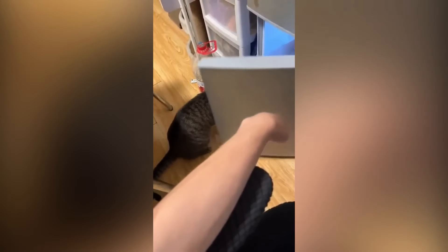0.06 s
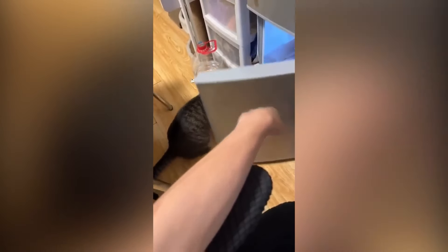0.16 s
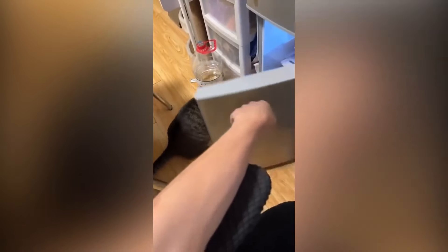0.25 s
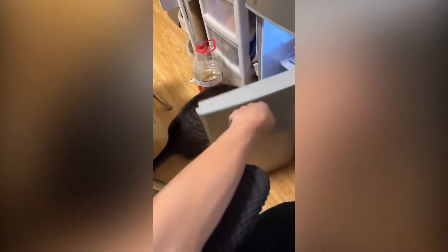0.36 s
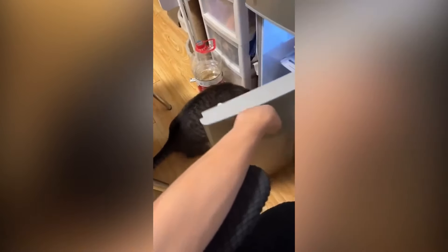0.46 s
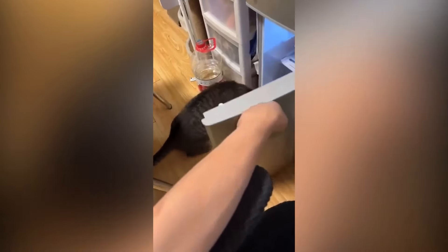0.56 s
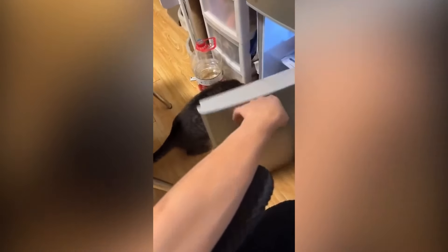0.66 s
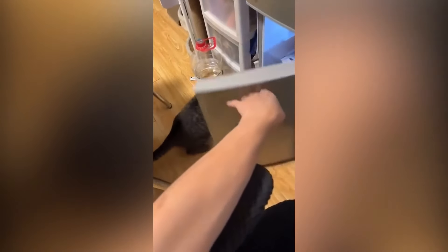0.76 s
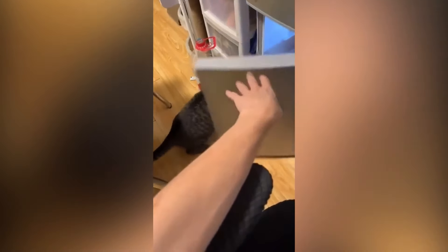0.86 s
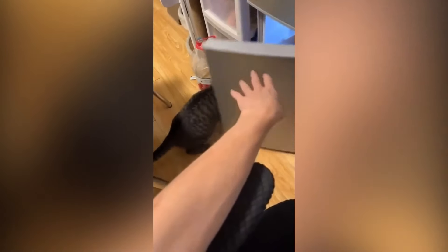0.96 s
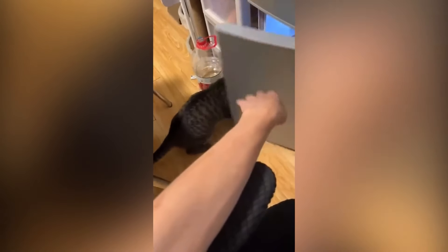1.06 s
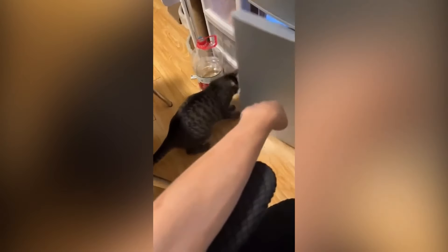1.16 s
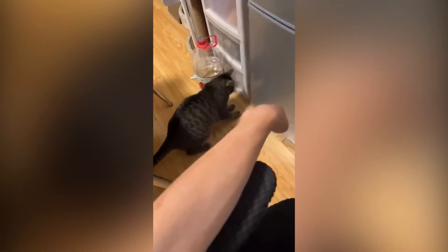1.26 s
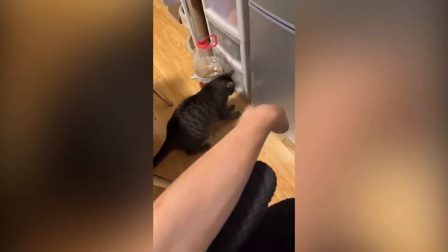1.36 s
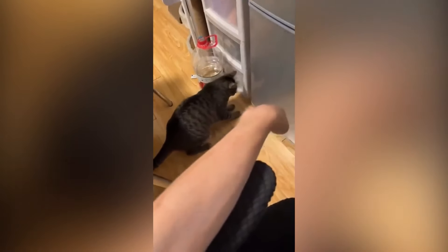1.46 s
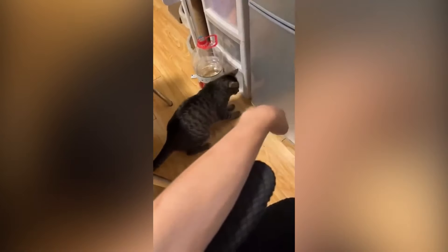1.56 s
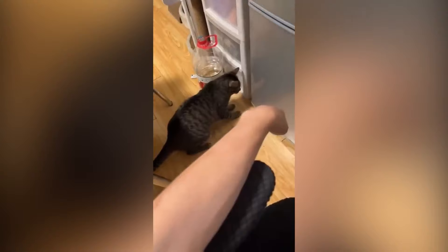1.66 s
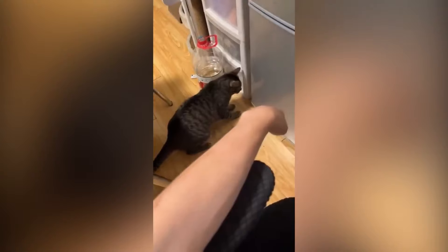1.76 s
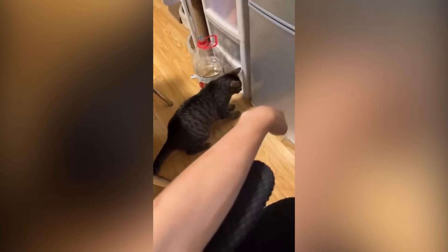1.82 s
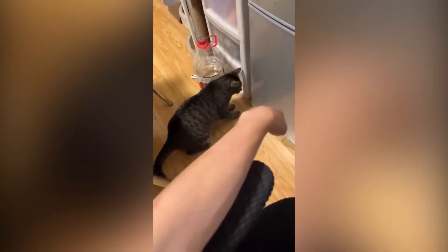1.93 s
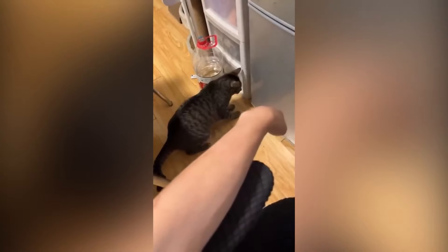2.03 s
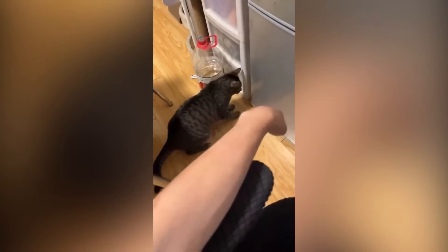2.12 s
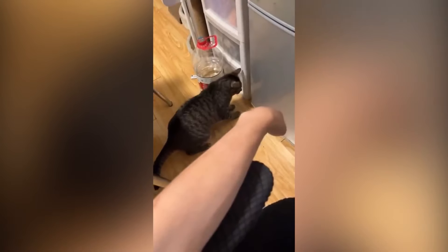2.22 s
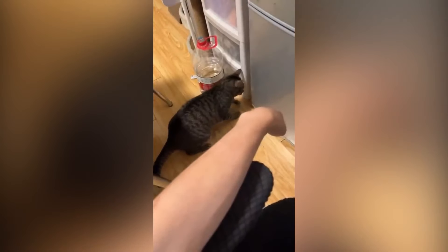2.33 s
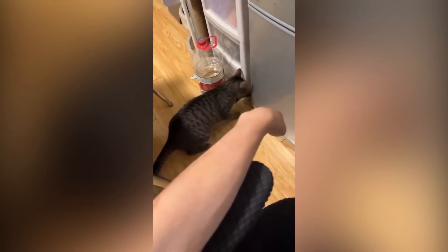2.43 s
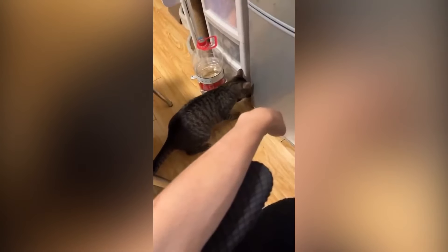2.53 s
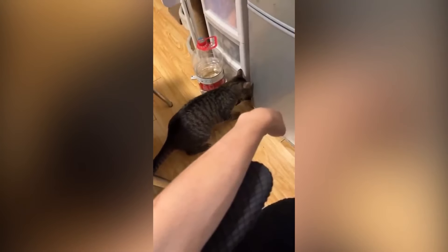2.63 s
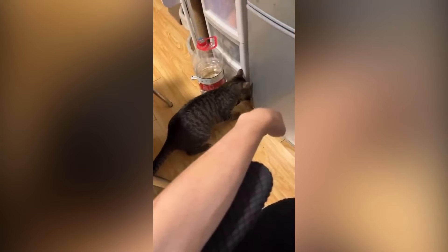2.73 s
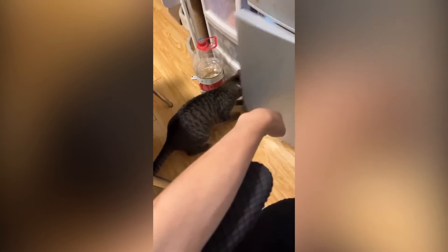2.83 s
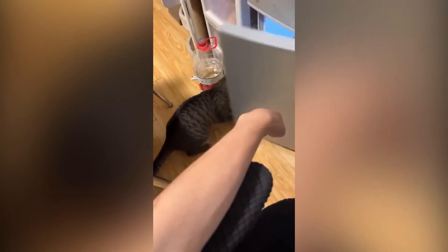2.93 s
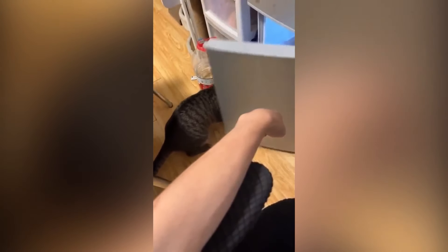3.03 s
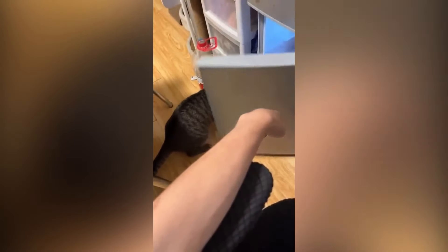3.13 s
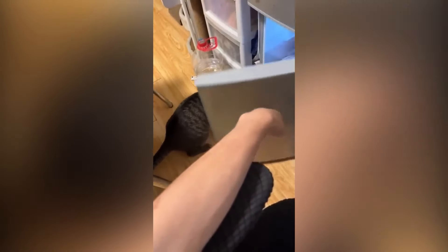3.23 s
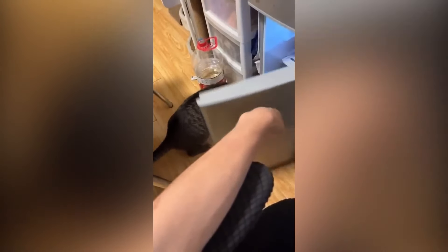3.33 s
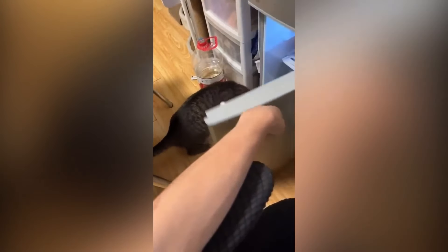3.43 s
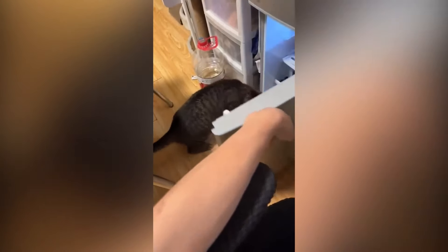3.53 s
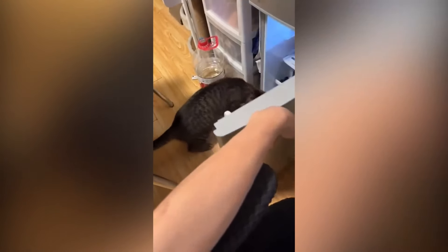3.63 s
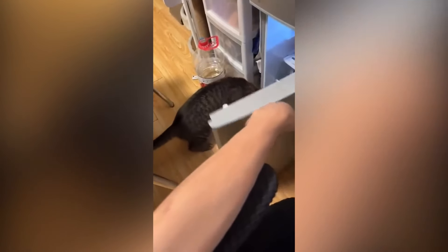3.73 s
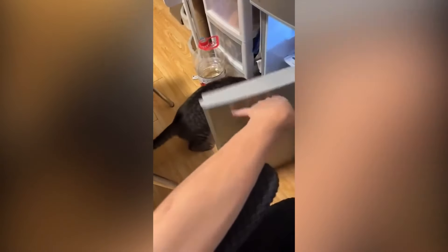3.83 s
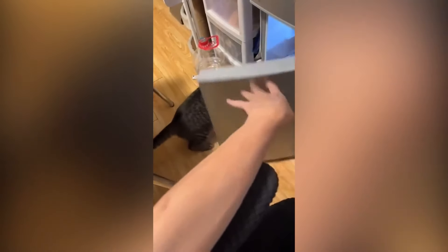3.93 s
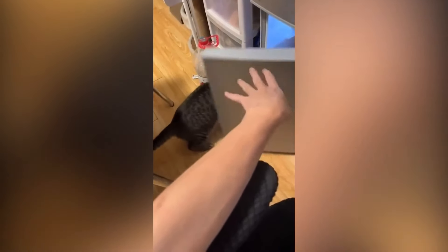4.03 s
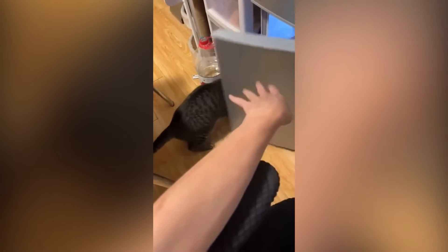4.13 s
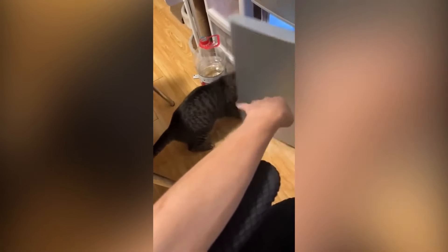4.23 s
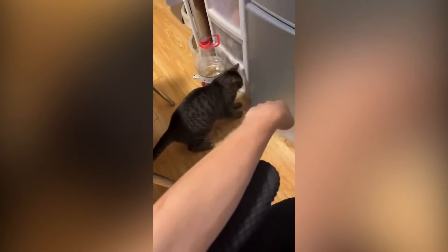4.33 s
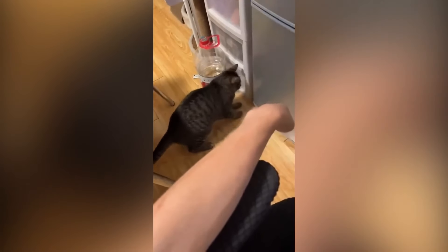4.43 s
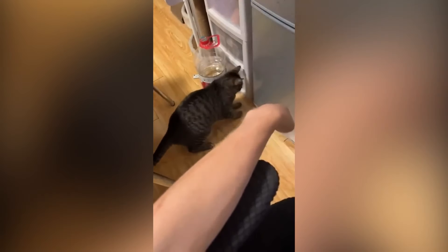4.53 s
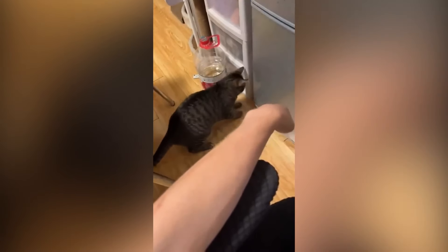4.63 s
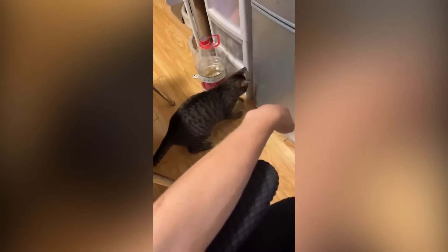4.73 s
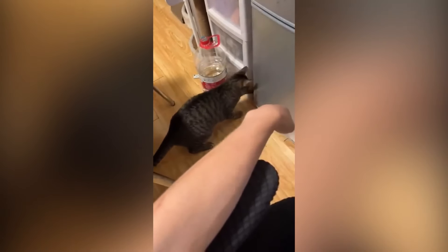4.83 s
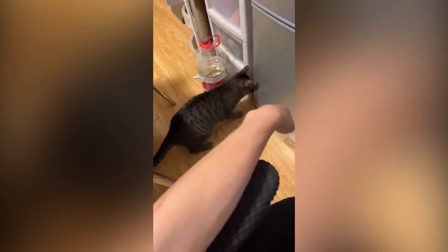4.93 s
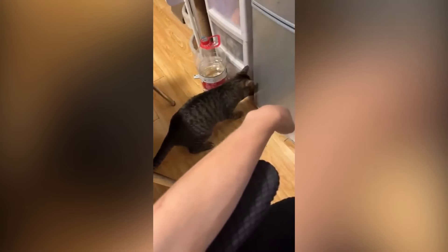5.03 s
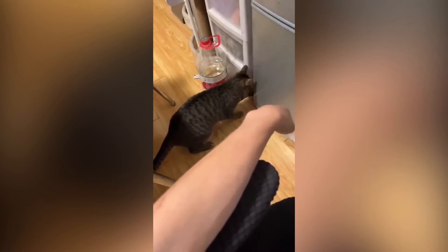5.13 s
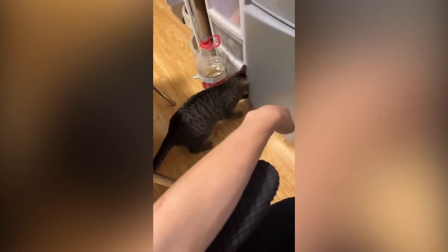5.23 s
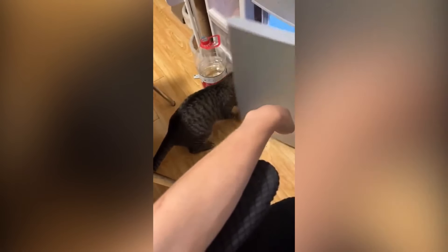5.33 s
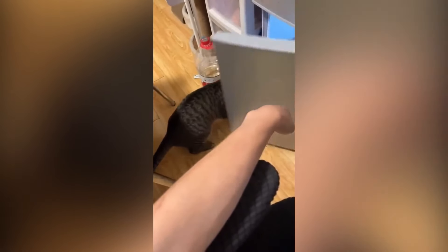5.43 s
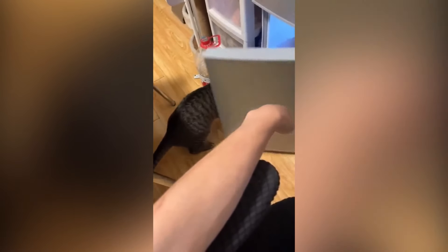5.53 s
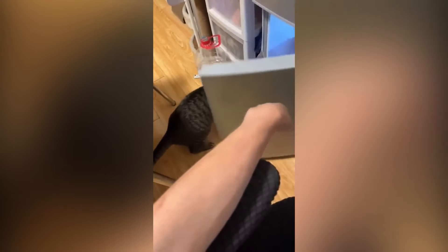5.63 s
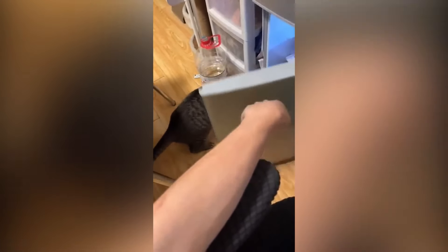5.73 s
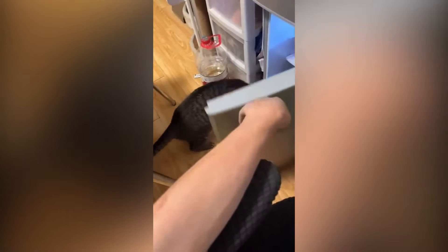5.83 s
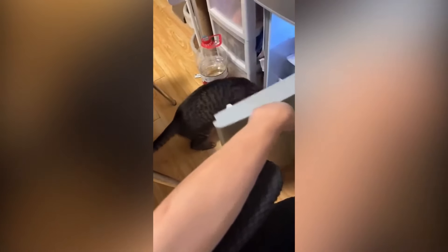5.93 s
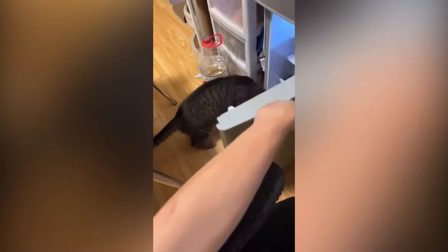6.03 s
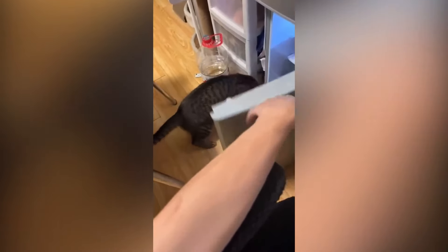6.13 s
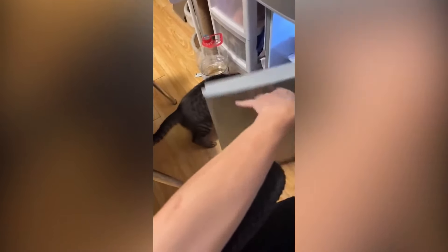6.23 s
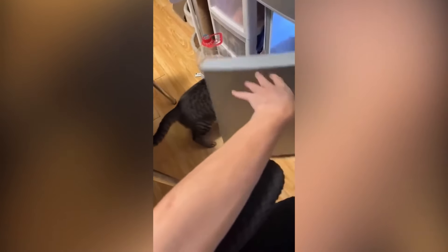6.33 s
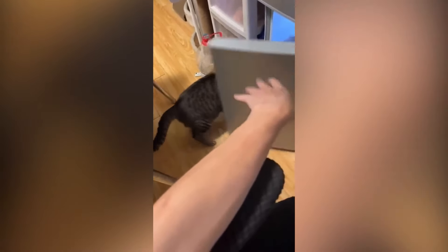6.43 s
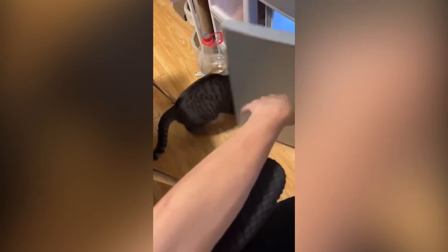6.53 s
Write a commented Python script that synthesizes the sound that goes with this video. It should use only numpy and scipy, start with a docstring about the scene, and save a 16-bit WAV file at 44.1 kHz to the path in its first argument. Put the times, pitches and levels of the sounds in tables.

```python
"""In a quiet room, a small fridge is swung open and pushed shut by hand, close to a microphone.
Friction noise and squeaks are the seal, load and hand; the seal pops, the door knocks at its open stop,
and a loose load clacks in the shelf: noise contacts exciting damped modes, dense ringing and the room.
Twice the door thuds home and low cabinet modes boom. Coloured noise is the air, wavering sines the
compressor's hum and whine; a low rumble, two deep hums and a rustling arm lie beneath."""
import sys
import numpy as np
from scipy import signal
from scipy.fft import rfft, irfft
from scipy.io import wavfile
from scipy.ndimage import uniform_filter1d

SR = 44100
rng = np.random.default_rng(int(sys.argv[2]) if len(sys.argv) > 2 else 0)


def dump_mix(stems):
    """Bounce the given channels to the path in sys.argv[1] as a 16-bit WAV at rate SR."""
    frames = np.atleast_2d(stems).T  # one column per channel
    limited = np.clip(frames, -1, 1)  # hard clip at full scale
    pcm = np.round(limited * 32767).astype(np.int16)
    wavfile.write(sys.argv[1], SR, pcm)


N = 289673

# Event levels are relative: each source's function adds its own trim.
# Door shuts: start_s, crack_level_db, tilt_db_per_octave, boom_gain_db
SHUT_EVENTS = [(1.353, -10.5, -0.37, -1), (4.481, -9.5, -0.5, -1)]
# Loose load slides, clacks in the door shelf, settles:
# start_s, level_db, tilt_db_per_octave, contact_ms, slide_db, settle_db
CLACK_EVENTS = [(0.7359, -30.5, 0.5, 5.7, -57, -54.5), (3.882, -22.5, 0.5, 14, -62, -64),
                (6.2306, -27, 1.5, 7.8, -62, -53)]
# Door meets its open stop, or the hand bumps it: start_s, level_db, tilt_db_per_octave, contact_ms
KNOCK_EVENTS = [(.211, -46.5, 2, 4.5), (.397, -28.5, -1.5, 7.1), (2.647, -41.5, -6, 8.7),
                (3.526, -26, 2, 7.8), (3.615, -39.5, 1.5, 3.4), (5.942, -27.5, .5, 8.2)]
# Magnetic seal peels and pops; the first, faint pop comes before it lets go: start_s, level_db,
# tilt_db_per_octave, contact_ms, peel_db
POP_EVENTS = [(2.722, -34, -1, 4.5, -72), (2.921, -28.5, 1, 5.7, -50), (5.3476, -24.5, -0.5, 6.2, -48)]
# Door panel modes: mode_hz, relative_level_db, t60_s
DOOR_MODES = [(125, -5.5, 0.4), (191.8, -1, 0.41), (261, -1, 0.25), (316, -18, 0.052), (381, -6, 0.27),
              (446.5, -10.5, 0.24), (523, -6.5, 0.23), (910, 2, 0.082), (1072, 9.5, 0.041),
              (1340, 3, 0.095), (1700, 9.5, 0.076), (1780, -6, 0.17), (2810, 13.5, 0.044)]


def amp(db):
    """Decibels to gain."""
    return 10 ** (np.asarray(db) / 20)


def evened(x):
    """Scales to rms 1."""
    return x / np.sqrt(np.mean(x ** 2) + 1e-20)


def unit(x):
    """Scales to energy 1."""
    return x / np.linalg.norm(x)


def decay(t, t60_s):
    """Exponential fall of 60 dB in t60_s."""
    return np.exp(-np.log(1000) * t / t60_s)


def read(points, hz):
    """Interpolates a table on a log-frequency axis."""
    f, value = np.transpose(points)
    return np.interp(np.log(hz + 1), np.log(f + 1), value)


def add(mix, start_s, sound):
    """Mixes a sound in at start_s, or at 0 if that is earlier."""
    part = mix[max(round(start_s * SR), 0):][:len(sound)]
    part += sound[:len(part)]


def noise(tone, size):
    """Noise of a given colour, rms 1."""
    gain = amp(read(tone, np.fft.rfftfreq(size, 1 / SR)))
    return evened(irfft(rfft(rng.standard_normal(size)) * gain, size))


def drift(width_hz):
    """Slow random wander: noise under a Gaussian low-pass, rms 1."""
    gain = np.exp(-(np.fft.rfftfreq(N, 1 / SR) / width_hz) ** 2)
    return evened(irfft(rfft(rng.standard_normal(N)) * gain, N))


def colour(x, tone, tilt_db_per_octave, size=4096):
    """Minimum-phase filter: a spectrum, tilted about 1 kHz."""
    hz = abs(np.fft.fftfreq(size, 1 / SR))
    octaves = np.log2(np.maximum(hz, 100) / 1000)  # tilt stops below 100 Hz
    log_gain = np.log(amp(read(tone, hz) + tilt_db_per_octave * octaves))
    response = np.exp(np.conj(signal.hilbert(log_gain)))
    taps = np.fft.ifft(response).real[:size // 2]
    return signal.fftconvolve(x, taps)[:len(x)]


def swells(strokes):
    """Hann-shaped level of strokes: middle_s, length_s, peak_db."""
    level = np.zeros(N)
    for middle_s, length_s, peak_db in strokes:
        start_s = middle_s - length_s / 2
        shape = signal.windows.hann(max(round(length_s * SR), 8))
        skipped = max(-round(start_s * SR), 0)  # part before time 0
        add(level, start_s, amp(peak_db) * shape[skipped:])
    return level


def friction(strokes, tone, grain_db, grain_hz):
    """Strokes of stick and slip: grainy noise that swells and fades."""
    grain = amp(grain_db * drift(grain_hz))
    return swells(strokes) * evened(noise(tone, N) * grain)


def chatter(envelope, count=3):
    """A burst under an envelope that holds all frequencies about equally."""
    burst = rng.standard_normal(len(envelope)) * envelope
    for _ in range(count):
        flat = irfft(np.exp(1j * np.angle(rfft(burst))), len(burst))
        burst = flat * envelope ** (1 / 4)
    return burst


def room_tail(t, rise_s):
    """Dense reflections that build up, then die band by band."""
    # Room decay: band_hz, t60_s
    room_decay = [(100, 0.52), (400, 0.31), (1200, 0.31), (3000, 0.35), (7000, 0.35), (14000, 0.23)]
    hz, frame_s, bands = signal.stft(rng.standard_normal(len(t)), SR, nperseg=256)
    fading = bands * decay(frame_s, read(room_decay, hz)[:, None])
    tail = signal.istft(fading, SR, nperseg=256)[1][:len(t)]
    return unit(tail * (1 - np.exp(-t / rise_s)))


def blow(tone, ringing, tilt_db_per_octave, contact_ms, swell, modes_db, shell_db, shell_t60_s, room_db):
    """One blow: chattering contact, the struck part's modes, dense shell ringing and the room."""
    t = np.arange(SR * 3 // 4) / SR
    progress = t * 1000 / max(contact_ms, .3)
    contact = unit(chatter(np.exp(-(progress - swell) ** 2)))  # peaks at swell contact times
    modes = unit(sum(amp(db) * decay(t, t60_s) * np.sin(2 * np.pi * (hz * t + rng.random()))
                     for hz, db, t60_s in ringing))
    shell = unit(chatter(decay(t, shell_t60_s)))
    ring = amp(modes_db) * modes + amp(shell_db) * shell
    ring = ring * (1 - np.exp(-2 * progress))  # builds while the contact lasts
    tail = amp(room_db) * room_tail(t, rise_s=0.0019)
    sound = colour(contact + ring + tail, tone, tilt_db_per_octave)
    return unit(sound) * np.sqrt(SR // 50)  # level is the energy spread over 20 ms


def blows(rows, tone, ringing, level_db, swell, modes_db, shell_db, shell_t60_s, room_db):
    """Plays a table of like blows, all trimmed by level_db."""
    out = np.zeros(N)
    for start_s, db, tilt, contact_ms, *_ in rows:
        one = blow(tone, ringing, tilt, contact_ms, swell, modes_db, shell_db, shell_t60_s, room_db)
        add(out, start_s, amp(db + level_db) * one)
    return out


def boom(rise_s=0.0032):
    """Two close low modes start in opposition, so the boom swells before it dies."""
    # Cabinet and room modes: mode_hz, level_db, t60_s, polarity
    cabinet_modes = [(41.4, -23, 0.73, -1), (49.8, -3, 0.41, -1), (54.03, 0, 0.33, 1),
                     (68.96, -13, 0.59, 1), (126.5, -18, 0.47, -1)]
    t = np.arange(SR * 3 // 2) / SR
    modes = sum(np.sign(polarity) * amp(db) * decay(t, t60_s) * np.sin(2 * np.pi * hz * t)
                for hz, db, t60_s, polarity in cabinet_modes)
    return modes * (1 - np.exp(-t / rise_s))


def room_air(level_db=-53):
    """Steady coloured noise of the room air."""
    # Air spectrum: frequency_hz, relative_level_db_per_hz
    air_tone = [(20, -33), (40, 1.5), (80, 6.5), (115, -2), (160, 1), (210, 2.5), (540, -1.5), (850, -11.5),
                (2100, -16.5), (3300, -18), (5300, -29.5), (8000, -31), (11500, -41.5), (13300, -33.5),
                (16000, -56)]
    return amp(level_db) * noise(air_tone, N)


def rumble(centre_hz=50, width_hz=11, rest_db=-63.5, linger_db=-28.5, fall_db_per_s=44):
    """Low narrow-band noise in the room that rests low and lingers after each shut."""
    t = np.arange(N) / SR
    wander = drift(width_hz) + 1j * drift(width_hz)
    band = evened((wander * np.exp(2j * np.pi * centre_hz * t)).real)
    linger = sum((t > s) * amp(linger_db - fall_db_per_s * abs(t - s)) for s, *_ in SHUT_EVENTS)
    return band * (amp(rest_db) + linger)


def sealed(t, fade_s=0.42):
    """1 from each shut until the seal next pops, else 0, with soft edges."""
    closed = np.zeros(len(t))
    for shut_s, *_ in SHUT_EVENTS:
        pop_s = min(s for s, *_ in POP_EVENTS if s > shut_s)
        closed += (t > shut_s) * (t < pop_s)
    return uniform_filter1d(closed, max(round(fade_s * SR), 1))


def compressor_hum(waver=0.039, wander_rad=1.0, sealed_db=6, sealed_below_hz=300):
    """Wavering sine lines; the lowest are louder while the door sits sealed on the cabinet."""
    # Compressor lines: line_hz, unsealed_rms_db
    hum_lines = [(123, -63.5), (194, -62.5), (538, -61.5), (2042, -76.5)]
    t = np.arange(N) / SR
    lift_db = sealed_db * sealed(t)
    out = np.zeros(N)
    for hz, db in hum_lines:
        level = 1 + waver * drift(8.9)
        phase = 2 * np.pi * hz * t + wander_rad * np.sqrt(hz / 1000) * drift(7.7)
        out += amp(db + lift_db * (hz < sealed_below_hz)) * evened(level * np.sin(phase))
    return out


def deep_hum(wander_rad=0.47, wander_hz=6):
    """A nearly pure low tone that swells and fades."""
    # Deep hums: middle_s, length_s, peak_db, pitch_hz
    hum_swells = [(.12, 0.96, -48.5, 53.2), (4.05, 0.98, -47, 45)]
    t = np.arange(N) / SR
    out = np.zeros(N)
    for middle_s, length_s, db, hz in hum_swells:
        tone = np.sin(2 * np.pi * hz * t + wander_rad * drift(wander_hz))
        out += swells([(middle_s, length_s, db)]) * evened(tone)
    return out


def whine(level_db=-69, sway_rad=0.76, jolt_rad=0.17, wander_rad=0.35, flutter_db=2.1, flutter_hz=24):
    """The drive's high tone, swayed once a turn by the compressor's load; its level flutters."""
    pitch_hz, shaft_hz = 4822, 48.6
    t = np.arange(N) / SR
    turn = 2 * np.pi * shaft_hz * t
    load = sway_rad * np.sin(turn) + jolt_rad * sum(np.sin(k * turn + k) for k in range(2, 5))
    tone = np.sin(2 * np.pi * pitch_hz * t + load + wander_rad * drift(97))
    return amp(level_db) * evened(tone * amp(flutter_db * drift(flutter_hz)))


def arm_rustle(rest_db=-77):
    """Grainy noise as the arm pulls (about each knock) and pushes (about each clack)."""
    pull_lag_s, pull_s, pull_db = 0.028, 0.4, -70
    push_lag_s, push_s, push_db = 0.039, 0.64, -63
    pulls = [(s + pull_lag_s, pull_s, pull_db) for s, *_ in KNOCK_EVENTS]
    pushes = [(s + push_lag_s, push_s, push_db) for s, *_ in CLACK_EVENTS]
    tone = [(300, 3), (2500, 2.5), (8000, -7.0), (10500, -16.5), (13500, -11.0), (16000, -23)]  # hz, db
    rustle = noise(tone, N) * amp(1.8 * drift(66))
    return rustle * (amp(rest_db) + swells(pulls + pushes))


def rubs():
    """Low friction noise: the hand pulls and presses on the door, which shudders after each pop."""
    # Hand strokes: middle_s, length_s, peak_db
    hand_strokes = [(.25, 0.21, -48), (2.61, 0.095, -47), (5.065, 0.15, -44), (5.61, 0.25, -47)]
    # Rub spectrum: frequency_hz, relative_level_db
    rub_tone = [(30, 7), (100, -4), (130, 8), (240, 13), (380, -3.5), (700, -6.5), (2000, -46),
                (12000, -42)]
    lag_s, length_s, over_peel_db = 0.039, 0.31, -1.5
    shudders = [(s + lag_s, length_s, peel_db + over_peel_db) for s, *_, peel_db in POP_EVENTS]
    return friction(hand_strokes + shudders, rub_tone, grain_db=-2.0, grain_hz=40.3)


def scrapes():
    """Friction: the load slides around each clack, rubber peels before each pop, fingers brush the edge."""
    # Fingers on the door's edge: middle_s, length_s, peak_db
    finger_strokes = [(2.597, 0.048, -63), (5.163, 0.08, -59.5)]
    # Scrape spectrum: frequency_hz, relative_level_db
    scrape_tone = [(100, -25), (700, -2), (1300, 2.5), (2500, -1), (4500, -14.5), (8000, -19), (10500, -30),
                   (13500, -25), (16000, -35)]
    slide_lead_s, slide_s = 0.031, 0.42
    settle_lag_s, settle_s = 0.16, 0.15
    peel_lead_s, peel_s = 0.026, 0.11
    slides = [(s - slide_lead_s, slide_s, slide_db) for s, *_, slide_db, _ in CLACK_EVENTS]
    settles = [(s + settle_lag_s, settle_s, settle_db) for s, *_, settle_db in CLACK_EVENTS]
    peels = [(s - peel_lead_s, peel_s, peel_db) for s, *_, peel_db in POP_EVENTS]
    strokes = slides + settles + peels + finger_strokes
    return friction(strokes, scrape_tone, grain_db=1.5, grain_hz=250)


def squeaks(width_hz=70):
    """Rubber sticks and slips: short rough tones, two a peel, lower as the seal gives."""
    # Squeaks of a peel: middle_before_pop_s, length_s, over_peel_db, pitch_hz
    peel_squeaks = [(.041, .055, -3, 1330), (0.00093, .02, 10.5, 1100)]
    out = np.zeros(N)
    for pop_s, *_, peel_db in POP_EVENTS:
        for lead_s, length_s, db, hz in peel_squeaks:
            swell = signal.windows.hann(max(round(length_s * SR), 8))
            turns = np.cumsum(hz + width_hz * drift(180)[:len(swell)]) / SR
            tone = evened(np.sin(2 * np.pi * turns))
            add(out, pop_s - lead_s - length_s / 2, amp(peel_db + db) * swell * tone)
    return out


def pops():
    """The seal pops and the door panel rings; the first, faint pop does not yet free it."""
    # Pop spectrum: frequency_hz, relative_level_db
    pop_tone = [(30, -46), (120, 11), (200, -12.5), (270, 5), (560, -1.5), (660, -17.5), (1080, -10),
                (1400, -18.5), (2800, -21.5), (5500, -37), (15000, -45)]
    return blows(POP_EVENTS, pop_tone, DOOR_MODES, level_db=-3, swell=0.51, modes_db=-9,
                 shell_db=-9.0, shell_t60_s=0.038, room_db=-3.5)


def knocks(rock_db=-11):
    """Dull blows through the hinge and the hand; each rocks the cabinet a little."""
    # Knock spectrum: frequency_hz, relative_level_db
    knock_tone = [(30, -15), (120, -4), (200, -1), (330, 1), (530, -3), (680, -15), (880, -16),
                  (1500, -25.5), (2500, -38), (5000, -63), (15000, -80)]
    out = blows(KNOCK_EVENTS, knock_tone, DOOR_MODES, level_db=-1.0, swell=0.71, modes_db=-9.0,
                shell_db=3.5, shell_t60_s=0.17, room_db=0.5)
    for start_s, db, *_ in KNOCK_EVENTS:
        add(out, start_s, amp(db + rock_db) * boom())
    return out


def clacks():
    """The load tips with a dry tick, then falls back against the ringing plastic shelf."""
    # Tick before each clack, and one rock back: start_s, level_db, tilt_db_per_octave, contact_ms
    tick_events = [(.6315, -42.5, 0.5, 0.82), (.862, -46.5, -2, 5), (3.7858, -27.5, 1, 0.51),
                   (6.164, -34.5, -.5, 0.35)]
    # Plastic shelf modes: mode_hz, relative_level_db, t60_s
    shelf_modes = [(199, 0, 0.11), (295, -2, 0.26), (440, -3, 0.054), (498, 5, 0.09), (576, 2, 0.28),
                   (930, 0, 0.24), (986, -4, 0.1), (1138, -6, 0.1), (1306, 15.5, 0.067), (1642, 19, 0.053),
                   (2022, 14, 0.056), (2606, 13.5, 0.12)]
    # Tick and clack spectra: frequency_hz, relative_level_db
    tick_tone = [(40, -26), (200, -3), (850, -13.5), (1300, -1.5), (2100, 2.5), (2800, -14.5), (5000, -22),
                 (8500, -30), (11000, -43), (16000, -45)]
    clack_tone = [(40, -12), (130, -6), (270, -5.5), (480, 3.5), (700, -7.5), (1000, 3), (1800, -2.5),
                  (2800, -7), (4000, -18), (7500, -30), (10500, -39), (13500, -42), (16000, -43)]
    tips = blows(tick_events, tick_tone, shelf_modes, level_db=-4.5, swell=0.73, modes_db=-16,
                 shell_db=6.0, shell_t60_s=0.077, room_db=-2)
    falls = blows(CLACK_EVENTS, clack_tone, shelf_modes, level_db=-1.5, swell=0, modes_db=-8.0,
                  shell_db=2.5, shell_t60_s=0.076, room_db=-3)
    return tips + falls


def shuts(crack_trim_db=-6, boom_lag_s=0.01124):
    """The rim touches, the seal slaps the frame, then the cabinet swings; handle tugs rock it too."""
    # Door rim first touches the frame: start_s, level_db, tilt_db_per_octave, contact_ms
    touch_events = [(1.305, -27, -0.5, 4.3), (4.437, -26, -1, 5.6)]
    # Cabinet rocks as the handle is tugged: start_s, boom_gain_db
    tug_events = [(2.67, -31.5), (2.742, -29.5), (2.85, -27), (5.293, -31.5)]
    # Touch and shut spectra: frequency_hz, relative_level_db
    touch_tone = [(40, -15), (130, -14), (270, -9.5), (420, -12), (700, -8), (1100, 0.5), (1700, -5),
                  (2700, -9), (3600, -18.5), (7500, -28), (10000, -42.5), (13000, -49), (16000, -55)]
    shut_tone = [(30, -15), (100, 10), (175, 4.5), (260, 8.5), (350, 2.5), (480, 1.5), (720, -3),
                 (1250, -2.5), (2400, -7), (4000, -13.5), (5500, -18), (8000, -16.5), (10000, -27),
                 (13500, -28), (16000, -33)]
    out = blows(touch_events, touch_tone, DOOR_MODES, level_db=-0.5, swell=0.35, modes_db=0,
                shell_db=2.0, shell_t60_s=0.029, room_db=2.5)
    for start_s, crack_db, tilt, boom_db in SHUT_EVENTS:
        crack = blow(shut_tone, DOOR_MODES, tilt, contact_ms=4.3, swell=1.42, modes_db=-19.5,
                     shell_db=-5.0, shell_t60_s=0.25, room_db=-2.0)
        add(out, start_s, amp(crack_db + crack_trim_db) * crack)
        add(out, start_s + boom_lag_s, amp(boom_db) * boom())
    for start_s, boom_db in tug_events:
        add(out, start_s, amp(boom_db) * boom())
    return out


def scene():
    """All sources at one microphone."""
    background = room_air() + rumble() + compressor_hum() + deep_hum() + whine() + arm_rustle()
    door = rubs() + scrapes() + squeaks() + pops() + knocks() + clacks() + shuts()
    return (background + door)[None]


def record(dry, edge_hz=15600):
    """Band limit: a linear-phase low-pass."""
    taps = signal.firwin(511, edge_hz, window=("kaiser", 9), fs=SR)
    return signal.oaconvolve(dry, taps[None], "same")


dry = scene()
out = record(dry)
dump_mix(out)
```